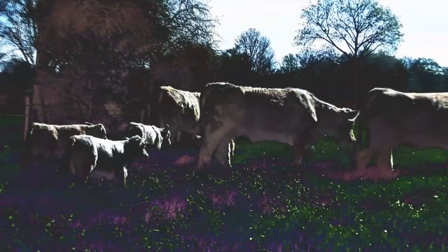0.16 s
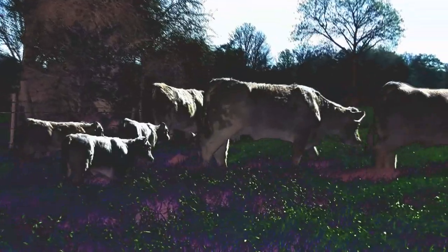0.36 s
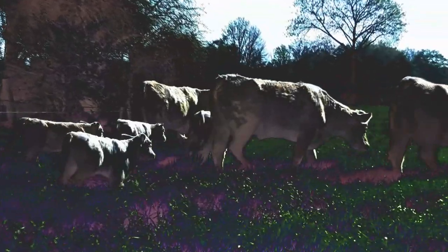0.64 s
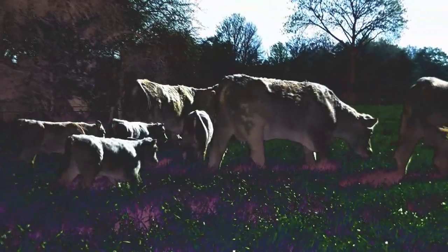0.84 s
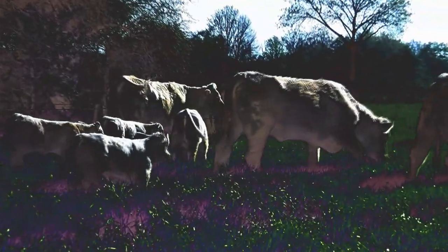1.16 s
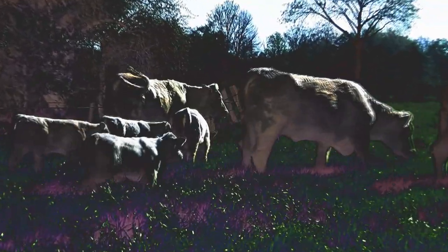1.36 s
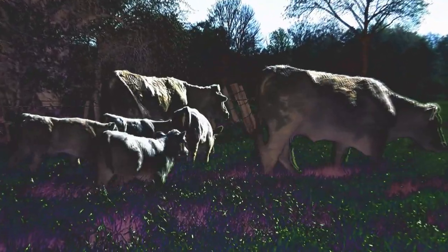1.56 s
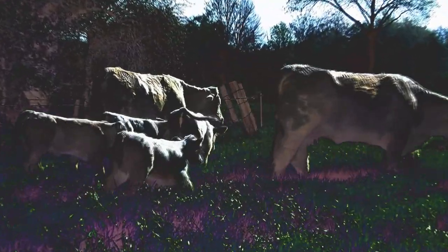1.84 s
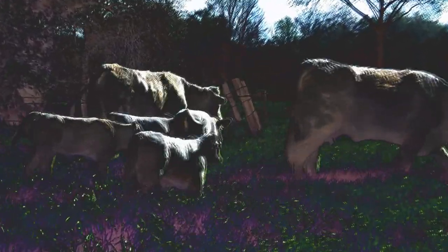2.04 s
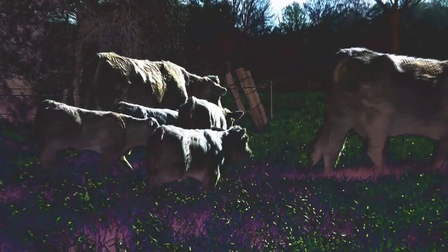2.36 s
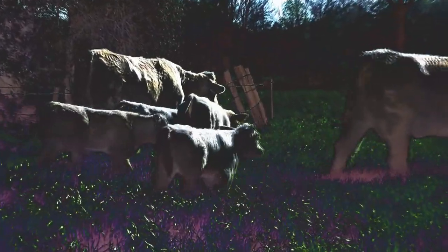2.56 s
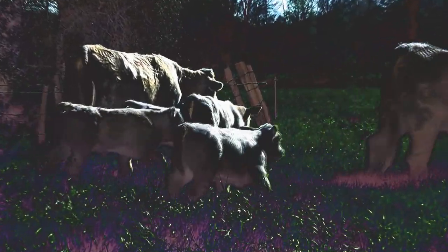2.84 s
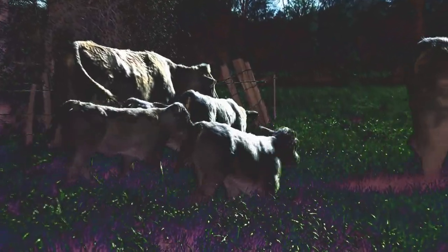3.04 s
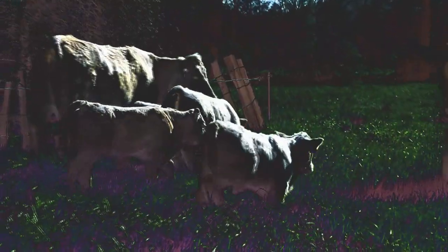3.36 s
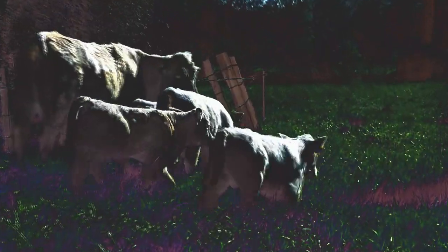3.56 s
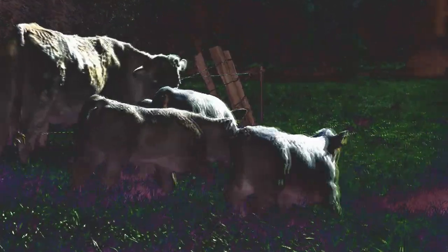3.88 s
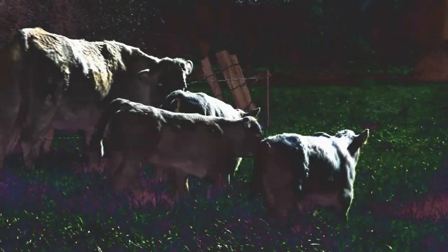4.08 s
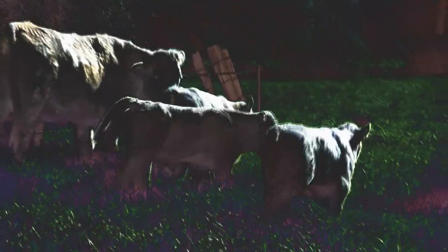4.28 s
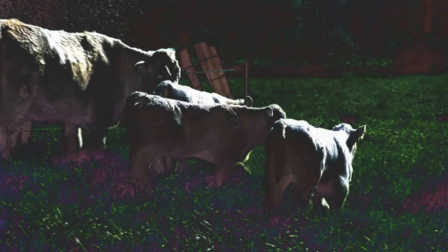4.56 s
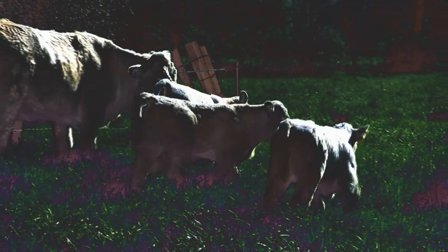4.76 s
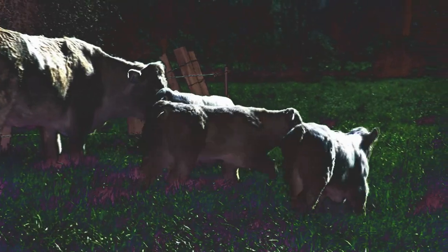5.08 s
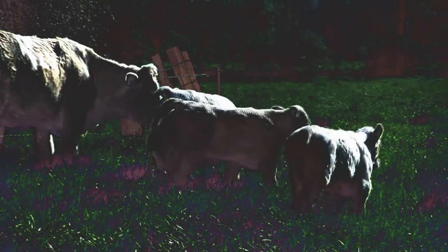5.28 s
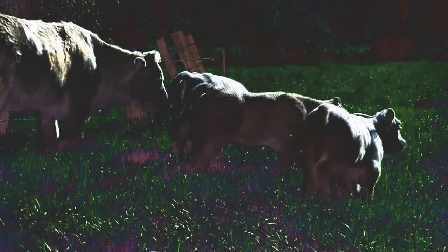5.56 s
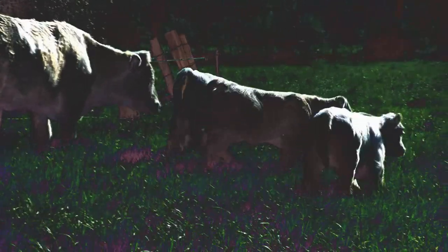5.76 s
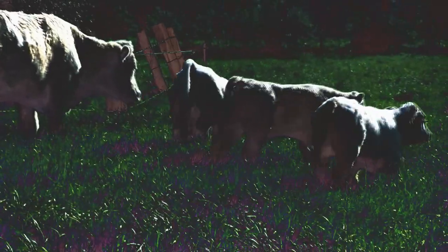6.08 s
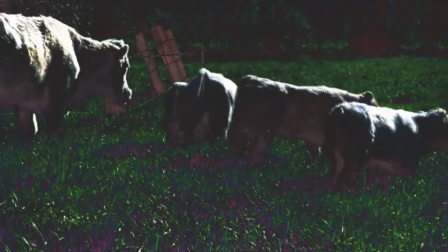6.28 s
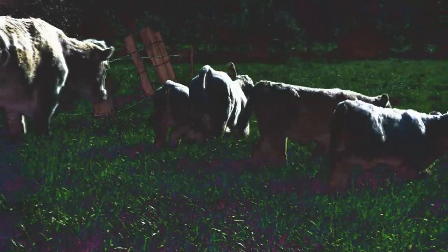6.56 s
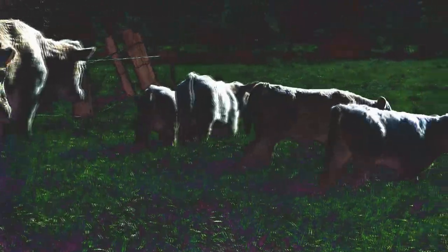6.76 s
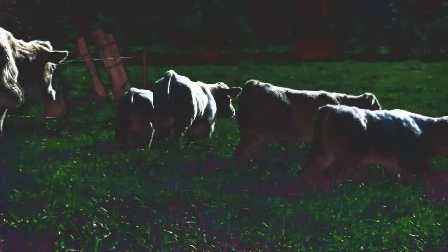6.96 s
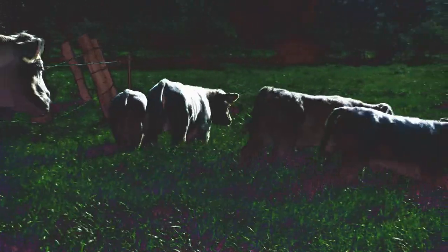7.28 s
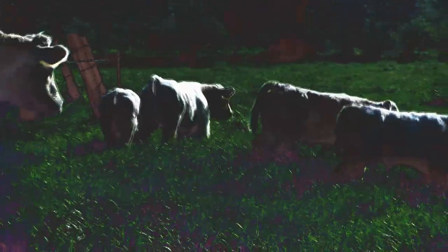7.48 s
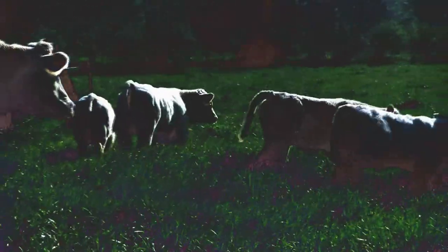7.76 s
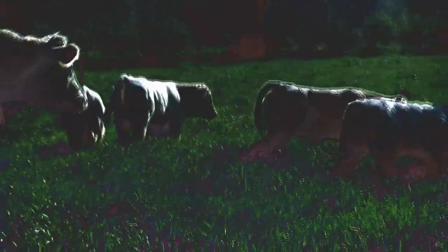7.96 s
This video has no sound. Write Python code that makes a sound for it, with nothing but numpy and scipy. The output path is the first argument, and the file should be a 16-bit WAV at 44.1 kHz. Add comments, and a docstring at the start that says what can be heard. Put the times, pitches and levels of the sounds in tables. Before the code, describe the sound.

Small birds chirp faintly over a soft breeze in a pasture, with dull bumps, close sleeve rustles and one sharp click.

```python
"""A pasture, where small birds whistle in the trees over a soft hush, a breeze in leaves and a faint hum.
Dull footfalls and bumps come through the ground and the grip of a hand-held camera, each a short low wave.
The camera's case rings briefly as it clicks, once very sharply, and a sleeve rustles close to the
microphones as its fibres catch and slip. The birds are gliding tones with echoes; the air is shaped noise."""
import sys
import numpy as np
from scipy import signal
from scipy.fft import rfft, irfft, next_fast_len
from scipy.io import wavfile

SR = 44100
rng = np.random.default_rng(int(sys.argv[2]) if len(sys.argv) > 2 else 0)


def to_wav(s):
    """Save 16-bit WAV."""
    ch = np.atleast_2d(s).T  # columns
    pcm = np.round(np.clip(ch, -1, 1) * 32767)  # PCM
    wavfile.write(sys.argv[1], SR, pcm.astype(np.int16))


N = 358533
SIZE = next_fast_len(N, True)
TIME, FREQS = np.arange(N) / SR, np.fft.rfftfreq(SIZE, 1 / SR)

# which side thuds and rustles lean to: (frequency [Hz], left minus right [dB])
NEAR_BALANCE = [(60, 1), (130, 2), (290, 0), (640, -9.5), (1410, -8.5), (3100, -2), (6820, -1.0),
                (15000, 1.5)]


def thuds(rise_cycles=0.54, sag_cycles=0.085, level_db=0.5, cut_hz=70):
    """Footfalls and bumps: a couple of cycles that swell, sink in pitch and die."""
    # the heavier blows: (time [s], level [dB], pitch [Hz])
    blows = [(0.112, -40.5, 710), (1.664, -38, 248), (2.198, -33, 188), (2.312, -38, 207),
             (2.352, -46, 167), (3.027, -42, 161), (3.752, -35, 181), (4.2905, -28.5, 310),
             (4.296, -40, 140), (4.769, -43, 277), (4.934, -36, 202), (5.042, -44.5, 181),
             (5.247, -40.5, 212), (5.423, -19, 380), (5.86, -34.5, 450), (5.915, -38, 403),
             (5.985, -38, 382), (6.048, -34.5, 440), (6.105, -32.5, 470), (6.122, -35, 423),
             (6.535, -27.5, 460), (6.62, -41, 330), (6.705, -41.5, 300), (6.965, -43.5, 330),
             (6.99, -43, 420), (7.211, -45.5, 199), (7.472, -43, 290), (7.698, -43, 200), (8.045, -39, 410),
             (8.093, -39, 190)]
    out, t = np.zeros(N), np.arange(SR // 12) / SR
    for s, db, hz in blows + grip_bumps():
        age = t * hz / rise_cycles  # 1 at the top of the swell
        cycles = hz * t + sag_cycles * (1 - np.exp(-t * hz))
        add(out, s, gain_of(db + level_db) * age ** 2 * np.exp(2 * (1 - age)) * np.sin(2 * np.pi * cycles))
    low_cut = signal.butter(2, cut_hz, "high", fs=SR, output="sos")
    return to_stereo(rfft(signal.sosfilt(low_cut, out), SIZE), NEAR_BALANCE)


def grip_bumps(gap_s=.05, spread_db=3, spread_octaves=.25):
    """A shifting grip patters unevenly. Gives rows of (time [s], level [dB], pitch [Hz])."""
    # when the grip shifts: (start [s], end [s], level [dB], pitch [Hz])
    fidgets = [(0.75, 1.45, -57, 330), (4.79, 4.84, -49, 300), (5.22, 5.4, -45, 190),
               (6.72, 6.95, -50, 200), (7.3, 7.85, -57, 200), (8.06, 8.13, -39, 430)]
    rows = []
    for (start, end, db, hz), chance in zip(fidgets, rng.standard_normal((len(fidgets), 64, 3))):
        for s, (late, hard, high) in zip(np.arange(start, end, gap_s), chance):
            rows.append((s + .3 * gap_s * late, db + spread_db * hard, hz * 2 ** (spread_octaves * high)))
    return rows


def case_clicks(level_db=-1.2, balance_db=-3.3, balance_db_per_octave=4.2, attack_s=.00012):
    """Each snap makes the case ring with its own short tones; the low ones lean to the right."""
    # snaps: (time [s], level [dB], treble tilt [dB per octave], ring length [factor])
    snaps = [(0.1016, -30, -7, 3.0), (0.1779, -22, 0, 1.2), (1.888, -37, 1, 1.0), (3.7869, -18, -4, 0.92),
             (4.2916, 0, 7.5, 1.27), (4.7356, -33.5, -6, 0.73), (5.2205, -30, 8, 1.5),
             (5.4246, -26.5, -11, 2.4), (5.902, -32.5, -5, 1.1), (6.079, -28.5, 2, 1.1),
             (6.149, -32, 5, 1.6)]
    # tones of the case: (pitch [Hz], level [dB], time to fade by 60 dB [s])
    case_tones = [(470, -39, 0.011), (858, -37, 0.049), (1444, -13, 0.016), (1950, -19.5, 0.018),
                  (2400, -11, 0.013), (2640, -8, 0.0095), (2990, -6.5, 0.0078), (3600, -7, 0.0073),
                  (4390, -14.5, 0.01), (5030, -12.5, 0.0095), (5300, -28, 0.011), (6440, -27, 0.0081),
                  (6900, -25, 0.0074), (7690, -27, 0.0064), (12000, -35, 0.0018)]
    out, t = np.zeros((2, N)), np.arange(SR // 8) / SR
    hz, tone_db, fade_s = np.transpose(case_tones)[:, :, None]
    octaves = np.log2(hz / 3000)
    sides = gain_of(np.outer([.5, -.5], balance_db + balance_db_per_octave * octaves))
    for s, db, tilt, ring in snaps:
        fades = gain_of(tone_db + tilt * octaves - 60 * t / (fade_s * ring))
        tones = fades * np.cos(2 * np.pi * hz * (t - attack_s))
        add(out, s, gain_of(db + level_db) * (sides @ tones) * (1 - np.exp(-t / attack_s)))
    return out


def sleeve(grain_db=1.2, slips_per_s=14000, judder_db=1.3, arch_db=3, bright_db=1.5, dull_db=-3.5):
    """Fibres catch and slip in a dense crackle: short brushes, and a drag that dulls as it slows."""
    # tone of rubbed cloth: (frequency [Hz], level [dB])
    cloth = [(30, -3), (110, -8), (200, -0.5), (330, -5.5), (520, 5), (680, -6), (1100, -1), (1400, -3),
             (1950, -0.5), (2500, -1), (3450, 3), (4700, 0), (5600, -12), (7500, -13), (9500, -20.5),
             (15500, -34)]
    # how alike the two sides are: (frequency [Hz], likeness [1 = same])
    likeness = [(60, 1), (180, 0.96), (550, 0.34), (1650, 0.54), (4970, 0.93), (15000, 1)]
    # short brushes: (start [s], length [s], level [dB], brightness [dB])
    brushes = [(0.77, 0.023, -54, -11), (0.918, 0.031, -53.5, -5), (1.327, .025, -56, -8),
               (1.401, 0.031, -52.5, -0.5), (4.731, 0.13, -48.5, 0), (4.879, 0.068, -51, 2),
               (5.043, 0.1, -47.5, 3.5), (5.219, 0.057, -40.3, 2.5), (5.27, 0.076, -49, 0),
               (5.334, 0.081, -44.5, 2), (5.984, 0.047, -45, -5.5), (6.043, 0.03, -45, -5),
               (6.1, 0.085, -41, -1.5), (6.25, .066, -39, 1), (6.377, 0.055, -47, 1),
               (6.531, 0.031, -41.5, -2.5), (6.66, .032, -41.5, 0.5), (6.976, .03, -45, -4),
               (7.784, 0.046, -52.5, -3.5), (8.034, 0.04, -51, -14), (8.078, 0.092, -45.5, 0)]
    # one long drag, dying away in surges: (time [s], level [dB])
    drag = [(5.42, -42), (5.5, -38.5), (5.525, -45), (5.565, -41), (5.605, -45), (5.627, -59), (5.662, -44),
            (5.695, -57), (5.72, -47.5), (5.738, -54), (5.76, -46.5), (5.835, -44.5), (5.88, -52)]
    slips = gain_of(grain_db * np.minimum(rng.exponential(1, N), 4)) * (rng.random(N) < slips_per_s / SR)
    crackle = slips * rng.standard_normal((2, N)) * gain_of(judder_db * drift(79))
    rub = shaped_noise(crackle, cloth, likeness, NEAR_BALANCE)
    out = np.zeros((2, N))
    for s, length, db, brightness in brushes:
        arch = np.sin(np.linspace(0, np.pi, round(length * SR)))  # firmest in mid-stroke
        add(out, s, sleeve_touch(rub, s, db + arch_db * (arch - .7), brightness))
    start, end = drag[0][0], drag[-1][0]
    level_db = np.interp(np.arange(start, end, 1 / SR), *np.transpose(drag))
    bright, dull = (sleeve_touch(rub, start, level_db, db) for db in (bright_db, dull_db))
    progress = np.linspace(0, 1, len(level_db))
    add(out, start, (1 - progress) * bright + progress * dull)
    return out


def sleeve_touch(rub, s, level_db, bright_db, attack_s=0.005, release_s=.016, fizz=0.69, fizz_hz=5300):
    """One touch of cloth, coloured by the air ringing in the hollow between sleeve and microphone."""
    # tones of the hollow: (pitch [multiple of the lowest], width [fraction], strength [factor])
    hollow = [(1, .09, 1.35), (1.77, .08, 1.0), (3.75, 0.13, .4), (5.4, 0.042, 0.7)]
    n = len(level_db)
    t, hz = np.arange(n) / SR, np.clip(np.fft.rfftfreq(n, 1 / SR), 400, 12000)
    pressed = 5.0 < s < 6.08  # pressing shrinks the hollow and raises its pitch
    hollow_hz, hollow_db = (1375, 7.5) if pressed else (855, 7)
    hollow_db += .45 * (np.median(level_db) + 46)  # louder strokes ring more
    peaks = sum(share * np.exp(-(np.log(hz / (hollow_hz * k)) / width) ** 2) for k, width, share in hollow)
    treble = np.log2(hz / 3000) / 2 + fizz * (1 + np.tanh((hz - fizz_hz) / 500))
    piece = rub.take(round(s * SR) + np.arange(n), axis=1, mode="wrap")
    piece = irfft(rfft(piece) * gain_of(bright_db * treble + hollow_db * peaks), n)
    contact = np.minimum(t / attack_s, 1) * np.minimum(t[::-1] / release_s, 1)
    return gain_of(level_db) * unit_level(piece) * contact


def birds(near_waver=0.0014, far_waver=0.009, flutter_db=1.1, fade_db=4, level_db=0.3,
          near_echo_db=-8.5, far_echo_db=-1):
    """Almost pure whistles; faint birds are far off, blurred and scattered by the trees."""
    direct, scattered = np.zeros(N), np.zeros(N)
    wobble, flutter = drift(160), gain_of(flutter_db * drift(50))
    for s, hz, db in songs() + calls() + twitters() + chatter():
        n = len(hz)
        far = np.interp(db, [-64, -57], [1, 0])
        waver = (near_waver + far * far_waver) * wobble.take(round(s * SR) + np.arange(n), mode="wrap")
        shape = signal.windows.tukey(n, 0.3) * gain_of(db + level_db + fade_db * np.linspace(1, 0, n))
        note = shape * np.sin(2 * np.pi * np.cumsum(hz * (1 + waver)) / SR)
        add(direct, s, note * (1 - 0.16 * far))
        add(scattered, s, note * gain_of(near_echo_db + far * (far_echo_db - near_echo_db)))
    return direct * flutter + tree_echoes(scattered)


def songs():
    """Piping, seesawing and tumbling songs, as notes of (time [s], pitch curve [Hz], level [dB])."""
    # kinds of note: (length [s], start pitch [Hz], middle pitch [Hz], end pitch [Hz])
    pip = (.085, 3630, 3660, 3635)
    high = (.145, 5690, 5530, 5660)
    low = (.195, 4220, 4305, 4240)
    peep = (.07, 5220, 5100, 5160)
    chip = (.042, 7280, 7150, 6680)
    slur = (.064, 5950, 5050, 4520)
    # tunes: (time into the song [s], note, accent [dB])
    piping = [(0, pip, 0), (.192, pip, 0), (.366, high, -4.5)]
    seesaw = [(0, low, 0), (.322, peep, -3)]
    tumble = [(0, chip, -5), (.126, chip, -4.5), (.228, slur, 0), (.335, slur, -.5), (.451, slur, 0),
              (.592, slur, -2)]
    # when each tune is sung: (time [s], level [dB])
    seesaws = [(1.15, -62), (1.655, -54.7), (2.19, -56), (2.758, -54)]
    tumbles = [(2.794, -54), (3.7, -59.5)]
    pipings = repeats(first_s=2.193, gap_s=.671, db=-55.7, step_db=1.1, count=4)
    notes = []
    for tune, starts in [(piping, pipings), (seesaw, seesaws), (tumble, tumbles)]:
        for s, db in starts:
            notes += [(s + after, glide(*note), db + accent) for after, note, accent in tune]
    return notes


def calls():
    """Single chirps that rise, arch or fall, and a row of distant pips."""
    # kinds of call: (length [s], start pitch [Hz], middle pitch [Hz], end pitch [Hz])
    upsweep = (.052, 3700, 4330, 5100)
    arch = (.035, 5120, 5370, 5420)
    rise = (.05, 3620, 3750, 3950)
    fall = (.055, 7000, 6170, 5700)
    far_slur = (.05, 4300, 4000, 3700)
    far_pip = (.05, 4750, 4700, 4660)
    # when each comes: (time [s], level [dB])
    upsweeps = [(1.919, -54), (4.075, -55)]
    arches = [(0.73, -62), (0.94, -61), (3.845, -58), (4.24, -60), (4.397, -59)]
    rises = [(0.04, -58), (1.195, -58), (1.5, -60), (6.975, -57)]
    falls = [(6.535, -59), (6.817, -63), (7.166, -62.5)]
    far_slurs = [(0.45, -62), (7.04, -62), (7.2, -60), (7.665, -57)]
    far_pips = repeats(first_s=6.6, gap_s=.244, db=-62, step_db=0, count=5)
    kinds = [(upsweep, upsweeps), (arch, arches), (rise, rises), (fall, falls),
             (far_slur, far_slurs), (far_pip, far_pips)]
    return [(s, glide(*note), db) for note, starts in kinds for s, db in starts]


def twitters(gap_s=.03, pitch_spread=.04, sag_hz_per_s=1200):
    """Quick runs of tiny notes, uneven in pitch and sinking as they go."""
    # runs: (start [s], length [s], level [dB])
    runs = [(1.54, .1, -56), (1.77, .12, -51)]
    syllable = glide(.024, 3880, 3520, 3700)
    notes = []
    for s, length, db in runs:
        for after, high in zip(np.arange(0, length, gap_s), rng.standard_normal(16)):
            notes.append((s + after, syllable * (1 + pitch_spread * high) - sag_hz_per_s * after, db))
    return notes


def chatter(notes_per_s=9, level_db=-65.5, spread_db=2.5, range_hz=(3500, 5600), length_s=.06, bend=.08):
    """Distant birds chirp at random all along, each note sliding up or down."""
    notes = []
    for when, high, slope, loud in rng.random((200, 4))[:round(notes_per_s * N / SR)]:
        hz, swing = np.interp(high, [0, 1], range_hz), bend * (2 * slope - 1)
        pitch = glide(length_s, hz * (1 + swing), hz, hz * (1 - swing))
        notes.append((when * N / SR, pitch, level_db + spread_db * (2 * loud - 1)))
    return notes


def tree_echoes(sound, fade_s=0.55, delay_s=.012):
    """The trees throw a sound back as a dense, fading wash of echoes."""
    t = np.arange(SR // 2) / SR
    echoes = rng.standard_normal((3, len(t))) * gain_of(-60 * t / fade_s) * (t > delay_s)
    echoes = echoes[:2] * 0.49 + echoes[2]  # the close microphones share most of each echo
    return signal.fftconvolve(sound[None], echoes / np.linalg.norm(echoes[0]), axes=1)[:, :N]


def air(hush_db=1.5, hiss_db=2.5, flutter_db=1.04, swell_db=1.0, swell_hz=2.5):
    """A low hush, the breeze in far leaves and a near bush, and a fine hiss, each wavering a little."""
    # tone of each layer: (frequency [Hz], level [dB])
    hush = [(15, -39), (25, -6), (44, -3), (81, -6), (130, -5.5), (183, -0.5), (262, -4), (305, 0),
            (390, -1.5), (490, -6.5), (700, -3.5), (1000, -5.5), (1300, -10), (2200, -57)]
    leaves = [(500, -23), (850, -5), (1200, -0.5), (1550, 2.5), (1900, -0.5), (2200, -1), (2600, -0.5),
              (3400, -1.5), (4000, -2), (5200, -6.5), (6300, -11.5), (9000, -32)]
    bush = [(500, -17), (1250, -20), (1480, 2), (1750, -3), (1950, -2.5), (2400, -1), (3400, -1.5),
            (4000, -22), (6000, -35)]
    hiss = [(4000, -16), (6500, -6.5), (7600, 1), (8700, -3.5), (10800, -2), (13000, -7.5), (15800, -11.5)]
    # how the hush and the hiss swell and ebb: (time [s], level [dB])
    hush_levels = [(0, -66), (0.4, -64), (0.7, -65.3), (1.3, -63.3), (2.1, -64.5), (3.8, -63), (5.15, -63),
                   (5.45, -59.7), (6.3, -61), (7.05, -64.5), (7.5, -63), (8.13, -64)]
    hiss_levels = [(0, -65), (2.3, -65), (2.6, -62.5), (2.85, -65.3), (4.4, -66), (7.3, -66.7), (8.13, -66)]
    # how hard the breeze blows: (time [s], far leaves [dB], near bush [dB])
    breeze = [(0, -55.7, -76), (1.1, -54.7, -70), (1.5, -54, -63), (4.1, -53.5, -65), (4.6, -54, -57),
              (5.0, -56, -64), (5.5, -53.7, -65), (6.55, -53.5, -63), (6.8, -55.5, -56.5),
              (7.25, -54, -57.5), (7.7, -57.5, -52.5), (8.13, -53.5, -57)]
    # how alike the two sides are: (frequency [Hz], likeness [1 = same, 0 or less = unrelated])
    likeness = [(60, 0.8), (120, 0.3), (240, -0.17), (480, -0.39), (950, 0.29), (1890, 0.69), (3770, 0.82),
                (7520, 1), (15000, 1.0)]
    # which side is louder: (frequency [Hz], left minus right [dB])
    balance = [(60, 1.0), (120, 0.0), (240, 0.12), (480, 2.4), (950, -0.078), (1890, 0.28), (3770, -1.1),
               (7520, 0.0), (15000, 0.0)]
    s, leaves_db, bush_db = np.transpose(breeze)
    layers = [(hush, np.interp(TIME, *np.transpose(hush_levels)) + hush_db),
              (leaves, np.interp(TIME, s, leaves_db)),
              (bush, np.interp(TIME, s, bush_db)),
              (hiss, np.interp(TIME, *np.transpose(hiss_levels)) + hiss_db + swell_db * drift(swell_hz))]
    out = np.zeros((2, N))
    for tone, db in layers:
        noise = shaped_noise(rng.standard_normal((2, N)), tone, likeness, balance)
        out += noise * gain_of(db + flutter_db * drift(18))
    return out


def hum(waver_hz=3, flutter_db=2, fade_db_per_s=.8):
    """A faint far-off hum: a few low tones that waver and slowly fade."""
    # its tones: (pitch [Hz], starting level [dB])
    tones = [(188, -83), (226, -82), (301.5, -79), (377, -77)]
    out = np.zeros(N)
    for hz, db in tones:
        level = gain_of(db + flutter_db * drift(3) - fade_db_per_s * TIME)
        out += level * np.sin(2 * np.pi * np.cumsum(hz + waver_hz * drift(4)) / SR)
    return np.sqrt(2) * out


def glide(length_s, start_hz, middle_hz, end_hz):
    """The pitch of a note: a smooth bend through three pitches."""
    curve = np.polyfit([0, .5, 1], [start_hz, middle_hz, end_hz], 2)
    return np.polyval(curve, np.linspace(0, 1, round(length_s * SR)))


def repeats(first_s, gap_s, db, step_db, count):
    """Evenly timed rows of (time [s], level [dB])."""
    return [(first_s + k * gap_s, db + k * step_db) for k in range(count)]


def shaped_noise(noises, tone, likeness, balance, cut_hz=28):
    """Gives two unrelated noises a tone and makes them partly alike, as left and right."""
    left, other = rfft(noises, SIZE)
    shared = np.clip(across_freqs(likeness), 0, 1)
    right = shared * left + np.sqrt(1 - shared ** 2) * other
    low_cut = FREQS ** 2 / (FREQS ** 2 + cut_hz ** 2)
    return unit_level(to_stereo(np.array([left, right]) * gain_of(across_freqs(tone)) * low_cut, balance))


def to_stereo(spectra, balance):
    """Turns spectra into left and right sound, each frequency leaning to its own side."""
    return irfft(spectra * gain_of(np.outer([.5, -.5], across_freqs(balance))), SIZE)[:, :N]


def across_freqs(points):
    """Joins (frequency [Hz], value) points into a curve on a log-frequency axis."""
    hz, value = np.transpose(points)
    return np.interp(np.log(FREQS + 1), np.log(hz + 1), value)


def drift(rate_hz):
    """A smooth random wander of typical size 1."""
    spectrum = rfft(rng.standard_normal(SIZE)) * np.exp(-(FREQS / rate_hz) ** 2)
    return unit_level(irfft(spectrum, SIZE)[:N])


def gain_of(db):
    """Decibels to a factor."""
    return 10 ** (np.asarray(db) / 20)


def unit_level(x):
    """Scales to an average (rms) level of 1."""
    return x / np.sqrt(np.mean(x ** 2) + 1e-20)


def add(mix, s, sound):
    """Mixes a sound in at s seconds."""
    part = mix[..., max(round(s * SR), 0):][..., :sound.shape[-1]]
    part += sound[..., :part.shape[-1]]


def scene():
    """The pasture, and the small noises at the camera."""
    return air() + hum() + birds() + thuds() + case_clicks() + sleeve()


def record(dry, top_hz=15900):
    """Flattens any peak beyond full scale, then removes the highest treble."""
    treble_cut = signal.firwin(511, top_hz, window=("kaiser", 7), fs=SR)
    return signal.oaconvolve(np.clip(dry, -1, 1), treble_cut[None], "same")


dry = scene()
out = record(dry)
to_wav(out)
```